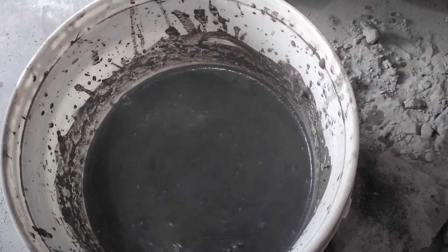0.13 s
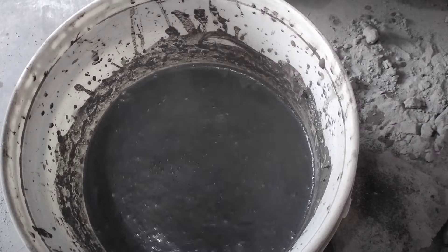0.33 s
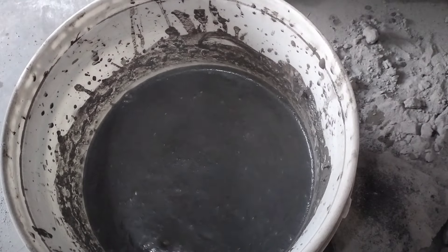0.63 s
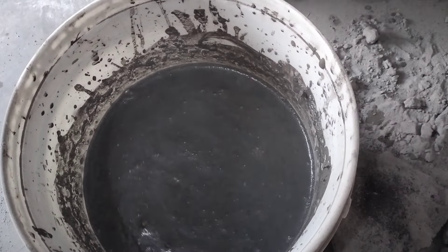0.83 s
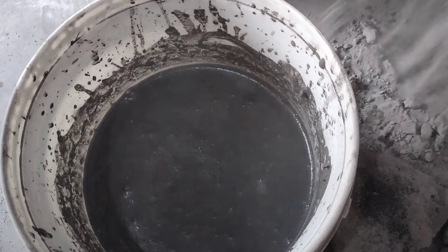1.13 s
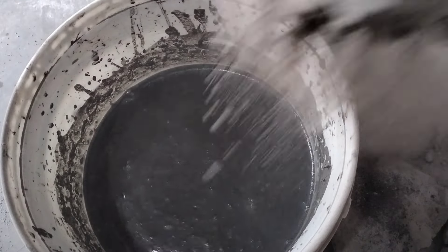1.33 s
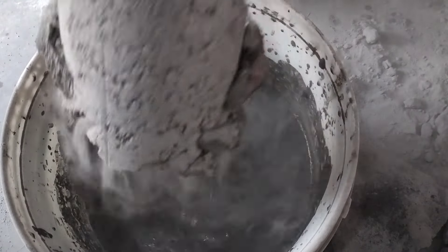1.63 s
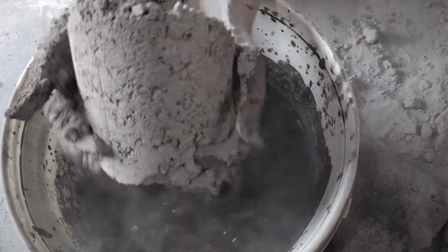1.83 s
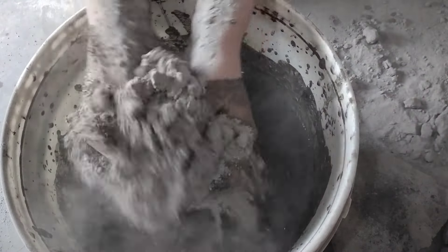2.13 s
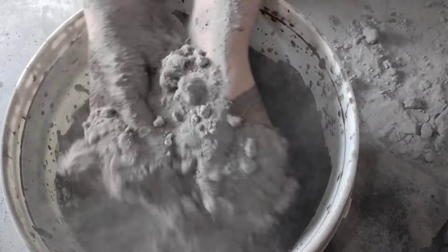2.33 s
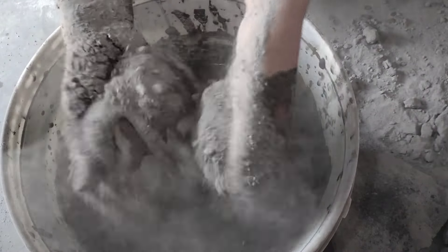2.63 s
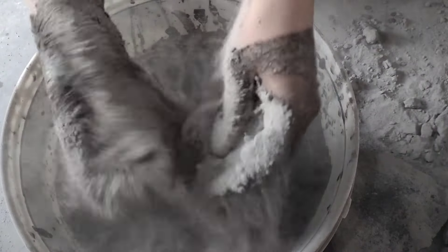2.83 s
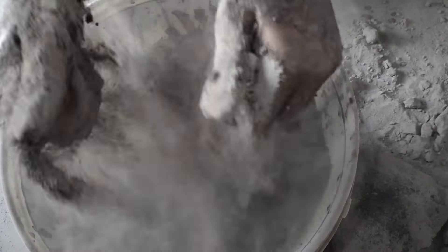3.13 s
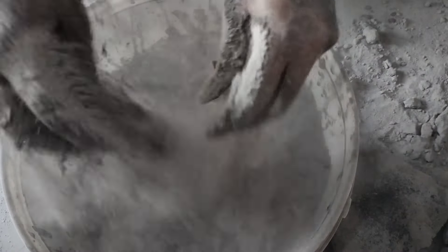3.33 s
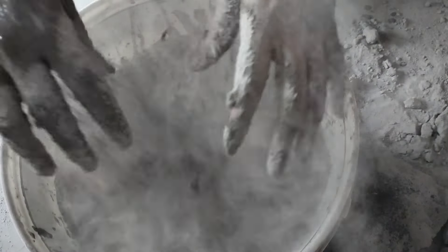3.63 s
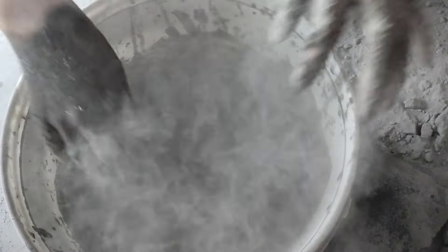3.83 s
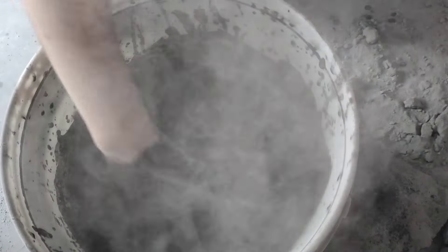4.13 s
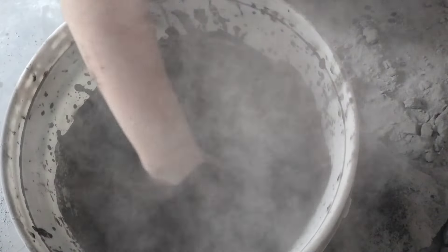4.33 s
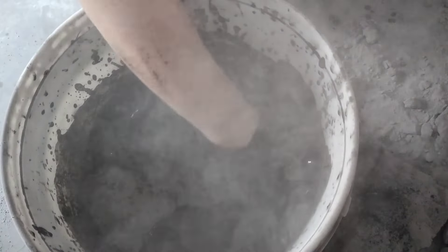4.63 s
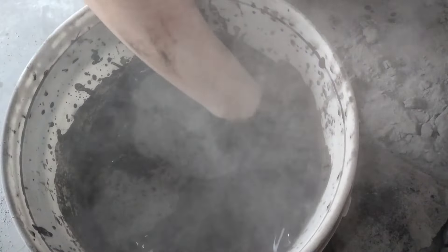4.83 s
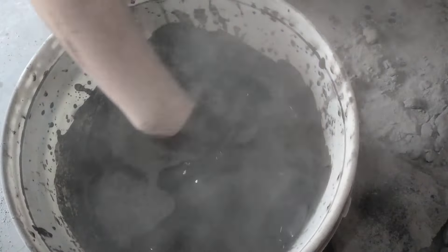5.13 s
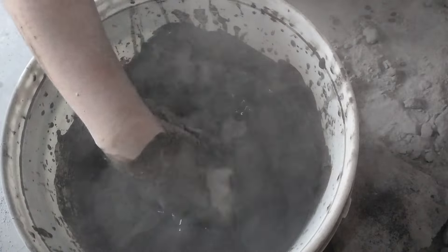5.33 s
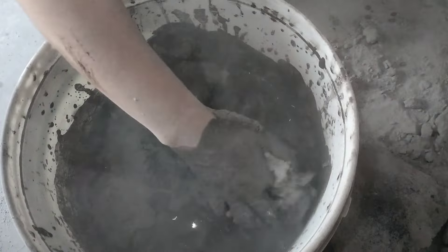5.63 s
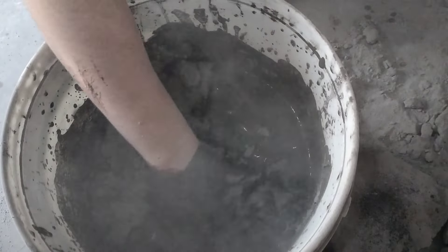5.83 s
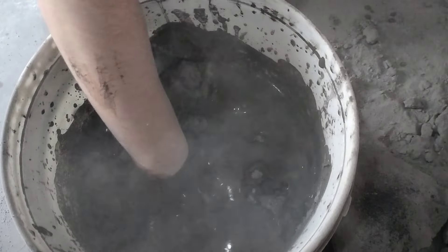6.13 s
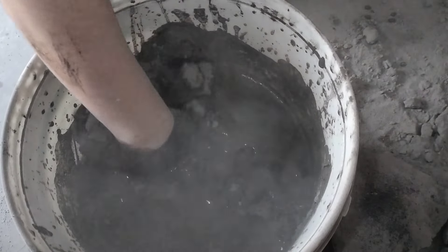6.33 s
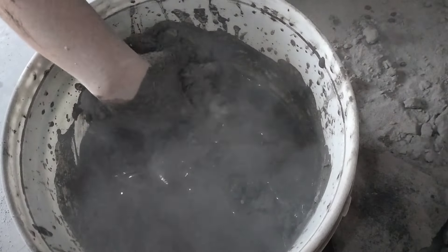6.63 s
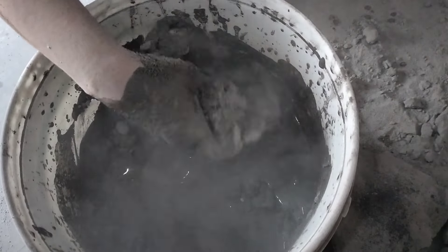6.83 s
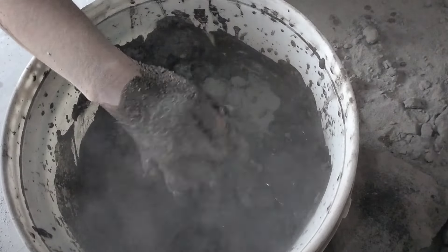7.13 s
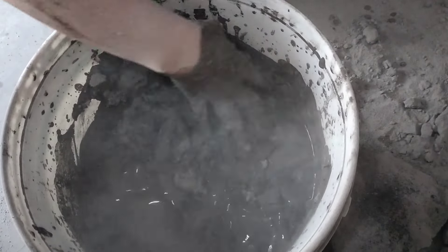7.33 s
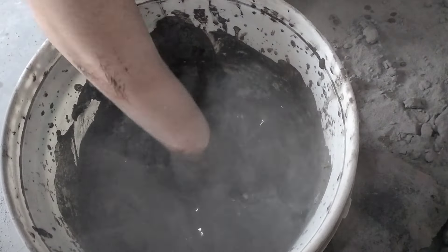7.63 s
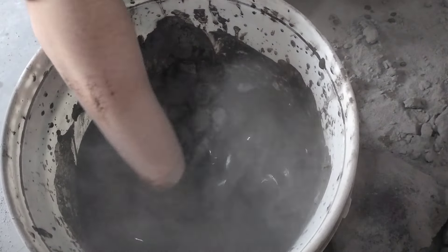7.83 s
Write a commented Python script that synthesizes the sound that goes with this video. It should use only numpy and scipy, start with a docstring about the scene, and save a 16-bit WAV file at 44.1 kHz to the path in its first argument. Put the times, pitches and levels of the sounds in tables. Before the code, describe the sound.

A close microphone above a plastic bucket indoors. Electrical hum and deep rumble come first, then short firm scrapes of packed powder. Dry lumps snap and crumble, grains rattling onto water in uneven spurts. Then wet sweeps of a hand churn the slurry: bubbling, fizzing, soft crunches, one clear hollow plop, tiny high ticks, and a final fizzy gush. A distant engine drones low in the middle.

```python
"""First come a wavering mains hum and a low rumble, then a block of dry powder scrapes as it is picked up.
It is crumbled into a bucket of water: grains patter as random clicks and bubbles, and lumps crack as noise.
One hand then stirs the gritty slurry. Bubble swarms churn and fizz; wet lumps crunch; air plops and ticks.
A far engine, made of two sine waves, swells and fades. Filtered noise makes the rumble and faint air."""
import sys
import numpy as np
from scipy import signal
from scipy.fft import rfft, irfft
from scipy.io import wavfile
from scipy.ndimage import uniform_filter1d

SR = 44100
rng = np.random.default_rng(int(sys.argv[2]) if len(sys.argv) > 2 else 0)


def transcribe(signal):
    """Save signal, clipped to [-1, 1], as a 16-bit WAV file at the path in sys.argv[1]."""
    frames = np.atleast_2d(signal).T
    limited = np.clip(frames, -1, 1)
    pcm = np.round(limited * 32767).astype(np.int16)
    wavfile.write(sys.argv[1], SR, pcm)


N = 352800
TIME = np.arange(N) / SR  # seconds

# Spills of powder; levels are relative, and fineness tilts the dust towards its top
# columns: start_s, rise_s, hold_s, fade_s, crumbs_db, dust_db, fineness_db
SPILLS = [(0.0, 0.011, 0.43, 0.096, -86, -75.5, 0), (1.04, 0.28, 0.048, 0.15, -56, -61.5, -2),
          (1.338, 0.039, 0.034, 0.13, -70.5, -58.5, 11), (1.454, 0.13, 0.09, 0.14, -60, -60, -11),
          (1.846, 0.076, 0.1, 0.12, -54.5, -65, -6.5), (2.067, 0.022, 0.009, 0.089, -49.5, -64, -14),
          (2.252, 0.038, 0.13, .05, -55.5, -64.5, -8), (2.348, 0.053, 0.056, 0.14, -46.5, -61, -6),
          (2.544, 0.029, 0.061, 0.051, -49, -57.5, -1), (2.61, 0.033, 0.037, 0.03, -53, -62, -2),
          (2.68, 0.093, 1.03, 0.068, -56.5, -75, -6), (3, 0.013, 0.017, 0.11, -71, -63.5, -2),
          (3.14, 0.1, 0.032, 0.27, -65, -68.5, -9)]
# Tone of the coarse crumbs; columns: frequency_hz, level_db
POUR_COLOUR = [(300, -24), (600, -16), (830, 6), (1100, 0.5), (1500, 6), (2600, -2.5), (3600, -5.5),
               (5000, -16), (9000, -25)]
# Tone of the fine dust; columns: frequency_hz, level_db
DUST_COLOUR = [(1800, -3), (3000, 2), (4200, -4.5), (5500, -1), (8000, -5), (12000, -0.5), (16000, -6)]


def pour():
    """Coarse crumbs patter on the water in uneven spurts; fine dust hisses with them."""
    shapes = [burst(*row[:4]) for row in SPILLS]
    crumb_db, dust_db, fineness_db = np.transpose(SPILLS)[4:]
    spurts = undb(1.1 * walk(60))
    swarm = bubble_swarm(low_hz=693, high_hz=3690, cycles=66, spread_db=2.0, count=3000)
    pellets = bubble_swarm(low_hz=1800, high_hz=6500, cycles=45, spread_db=1, count=3000)
    crumbs = colour(.5 * (swarm + pellets) + clicks(rate=4500, spread_db=5.5), POUR_COLOUR)
    crumbs = wall_echo(crumbs, lag_s=0.0028, sway_s=0.0002, share=.55)
    sand = clicks(rate=1200, spread_db=1.5)  # sparser grains stand out of the finest dust
    dust = colour(clicks(rate=15000, spread_db=1.0) + .5 * sand, DUST_COLOUR)
    dust = wall_echo(dust, lag_s=0.0023, sway_s=0.0003, share=.22)
    dust = fine_grains(dust, shapes, dust_db, fineness_db, corner_hz=8100) * undb(walk(80))
    return spurts * (undb(-4.5) * overlap(shapes, crumb_db) * crumbs + undb(2.5) * dust)


# Dry lumps cracking; levels are relative, and treble is relative to the starting level
# columns: start_s, level_db, treble_db, t60_s (time to fall 60 dB), centre_hz, width_hz
LUMPS = [(.888, -35, -11, 0.032, 1520, 300), (1.358, -33.5, -2, 0.024, 2600, 3000),
         (1.368, -36, -1.5, 0.03, 2710, 3020), (1.591, -40, -20, .025, 1350, 300),
         (1.618, -49, -18, .025, 1800, 900), (1.664, -40, -19, .03, 900, 300),
         (1.986, -37.5, -15, 0.086, 1800, 2000), (2.096, -36.5, -16, 0.039, 2640, 2200),
         (2.106, -41, -18, 0.032, 1500, 900), (2.345, -45, -18, 0.11, 1700, 1500),
         (2.378, -32, -20, 0.024, 1590, 700), (2.396, -31, -4, 0.035, 1900, 800),
         (2.414, -40, -16, .04, 1700, 1200), (2.437, -35, -11, 0.044, 1500, 1500),
         (2.456, -32, -5, 0.026, 2400, 1500), (2.464, -27, -16, 0.015, 1420, 500),
         (2.573, -29.5, 3, 0.031, 2300, 3000), (2.586, -25, -7, 0.065, 2880, 1600),
         (2.610, -26.5, -9, 0.029, 1490, 1100), (2.626, -36, -2, .05, 2400, 2500),
         (2.642, -35, -12, .04, 1700, 1500), (2.672, -27.5, -7, 0.021, 1300, 600),
         (2.69, -42, -20, .08, 1500, 1200), (2.808, -40, -26, 0.018, 1400, 700),
         (3.014, -37, -5, 0.094, 1780, 900), (3.038, -33, -20, 0.024, 1450, 700),
         (3.279, -34, -22, .028, 1400, 1100), (3.33, -40, -19, 0.076, 1620, 1200)]
# Tone of dry, crumbly material; columns: frequency_hz, level_db
CRUNCH_COLOUR = [(450, -2), (800, -32), (1100, 21.5), (1500, 18), (2000, 18), (2700, 13), (3700, 12.5),
                 (5000, -4), (9000, -24)]


def dry_lumps():
    """Dry lumps crack and crumble in the hand."""
    return crunches(LUMPS, CRUNCH_COLOUR, db=-11.0, treble_db=-8.5, crack=6)


# Soaked lumps collapsing in the fist; levels are relative, and treble is relative to the starting level
# columns: start_s, level_db, treble_db, t60_s (time to fall 60 dB), centre_hz, width_hz
SQUELCHES = [(4.258, -37, -16, 0.036, 1450, 400), (4.289, -45, -14, .04, 2830, 900),
             (4.328, -42, -16, .05, 1500, 1200), (4.346, -37, -8, 0.046, 1400, 1200),
             (4.5575, -30, -8, 0.053, 2900, 3000), (4.573, -35, -8, 0.074, 2000, 2500),
             (4.592, -38, -5, .04, 2900, 1200), (4.730, -34.5, -30, 0.031, 1100, 1000),
             (4.755, -34, -28, 0.055, 1440, 700), (4.773, -33.5, -29, 0.05, 1200, 1300),
             (4.839, -30, -21, 0.019, 1900, 2400), (4.935, -34.5, -24, .04, 1000, 600),
             (4.962, -44, -16, .05, 2740, 800), (5.591, -40.5, -1.5, 0.038, 2460, 1800),
             (5.690, -41, -4, 0.039, 2000, 2000), (7.159, -45.5, 1, 0.034, 1300, 2000),
             (7.198, -36.5, -13, 0.027, 2150, 1800), (7.251, -29, -16, 0.029, 1500, 600),
             (7.274, -34.5, -4, 0.022, 1090, 800), (7.276, -33, 5, 0.019, 4160, 1000),
             (7.301, -43.5, 4, .04, 2300, 600), (7.364, -38.5, -5, 0.046, 2520, 1200),
             (7.383, -40, -6, 0.058, 2200, 2200), (7.394, -39.5, -3, 0.051, 1480, 1500),
             (7.869, -58, -3, 0.13, 2020, 3000)]
# Tone of soaked material; columns: frequency_hz, level_db
SQUELCH_COLOUR = [(400, -7), (620, 3.5), (820, 21), (1050, 13.5), (1400, 16), (1900, 15), (2700, 7),
                  (3500, 10), (4300, 0), (8000, -30)]


def wet_lumps():
    """Soaked lumps collapse in the fist, by the same crack and avalanche of grains."""
    return crunches(SQUELCHES, SQUELCH_COLOUR, db=-5, treble_db=-5, crack=6)


# Tone of the fine splinters; columns: frequency_hz, level_db
SPLINTER_COLOUR = [(2800, 18), (4000, -1), (5500, 10.5), (8000, 10), (11000, 3), (16000, -2)]
SPLINTER_RISE_S, CRUNCH_GRAINS_PER_S = .0013, 2900


def crunches(table, body_colour, db, treble_db, crack):
    """Each lump gives one crack and a quick avalanche of grains, ringing at the lump's own pitch."""
    body, treble = np.zeros(N), np.zeros(N)
    t = np.arange(SR // 4) / SR
    material = colour(signal.unit_impulse(N), body_colour)[:SR // 40]
    density = CRUNCH_GRAINS_PER_S / SR
    for s, start_db, bright_db, t60, hz, width_hz in table:
        coarse, fine = rng.standard_normal((2, len(t))) * np.exp(-np.log(1000) * t / t60)
        coarse *= (rng.random(len(t)) < density) / np.sqrt(density)
        coarse[0] += crack
        ring = band(material, hz, width_hz)
        ring = ring / np.linalg.norm(ring)
        add(body, s, undb(start_db + db) * signal.fftconvolve(coarse, ring))
        # fine splinters follow the crack a moment later
        splinters = fine * (1 - np.exp(-t / SPLINTER_RISE_S))
        add(treble, s, undb(start_db + bright_db + treble_db) * splinters)
    return body + colour(treble, SPLINTER_COLOUR)


# Rubs on the packed powder as it is picked up; levels are relative
# columns: start_s, rise_s, hold_s, fade_s, body_db, rasp_db, squeak_db
RUBS = [(0.882, 0.008, .035, 0.014, -57, -58, -68), (0.94, 0.025, 0.08, 0.016, -57.5, -66.5, -70),
        (1.07, .02, .02, .02, -76, -72, -75), (1.165, 0.045, .075, .03, -53.5, -66, -77),
        (1.302, 0.013, 0.045, 0.024, -56.5, -70, -78)]
# The scrape's resonances shift with the grip; columns: time_s, body_hz, rasp_hz
SCRAPE_PITCH = [(.89, 1510, 3160), (0.931, 1500, 3360), (.98, 1510, 3600), (1.03, 1466, 3550),
                (1.1, 1510, 3700), (1.19, 1516, 3580), (1.25, 1479, 3510), (1.33, 1526, 3500)]
# Resonances of the rasp; columns: multiple of the rasp pitch, width_hz, level_db
RASP_MODES = [(.6, 240, -1.5), (.79, 190, -6), (1, 250, 6)]
SCOOP_HZ, SCOOP_WIDTH_HZ = 1520, 80  # body resonance before its pitch is shifted
RASP_HZ = 3450  # pitch at which the rasp has its listed widths
SQUEAK_RATIO, SQUEAK_WIDTH_HZ = 1.19, 250  # the squeak's pitch is this many times the rasp's


def scoop():
    """Lifted powder scrapes in fits: a firm resonance, a rasp and a squeak shift with the grip."""
    shapes = [burst(*row[:4]) for row in RUBS]
    body_db, rasp_db, squeak_db = np.transpose(RUBS)[4:]
    s, body_hz, rasp_hz = np.transpose(SCRAPE_PITCH)
    rub = clicks(rate=1600, spread_db=-1.5)
    body = unit(band(band(rub, SCOOP_HZ, SCOOP_WIDTH_HZ), SCOOP_HZ, 2 * SCOOP_WIDTH_HZ))
    body = shift_pitch(body, np.interp(TIME, s, body_hz) / SCOOP_HZ)
    grip = np.interp(TIME, s, rasp_hz) / RASP_HZ

    def catching(hz, width_hz):
        """One resonance of the rub, catching and slipping at random."""
        return shift_pitch(undb(5 * walk(40)) * band(band(rub, hz, width_hz), hz, width_hz), grip)

    rasp = unit(sum(undb(db) * catching(ratio * RASP_HZ, width_hz) for ratio, width_hz, db in RASP_MODES))
    squeak = unit(catching(SQUEAK_RATIO * RASP_HZ, SQUEAK_WIDTH_HZ))
    loose_grains = colour(clicks(rate=4900, spread_db=5.0), DUST_COLOUR)
    rasp = rasp + undb(-5) * loose_grains
    scrape = overlap(shapes, body_db) * body + overlap(shapes, rasp_db) * rasp
    return scrape + overlap(shapes, squeak_db) * squeak


# Tone of the churning bubbles; columns: frequency_hz, level_db
CHURN_COLOUR = [(300, -16.5), (430, -1), (620, -13.5), (810, 4.5), (1050, -3.5), (1350, -4.5), (1850, -1.5),
                (2300, -14), (3500, -37)]
# Tone of the fizzing powder; columns: frequency_hz, level_db
FIZZ_COLOUR = [(1300, 2), (2100, -9.5), (2650, -4), (3300, -7.5), (4200, -20), (6000, -11)]
# Tone of the crackling grit; columns: frequency_hz, level_db
SPRAY_COLOUR = [(3000, -4.5), (4300, -2.5), (5300, -0.5), (7500, -3), (10000, -5), (12000, -5),
                (16000, -11)]


def stir():
    """The hand churns up bubbles; soaking powder fizzes and grit crackles above them."""
    shapes, churn_db, fizz_db, grit_db, fineness_db = strokes()
    surge = undb(1.2 * walk(55))
    large = bubble_swarm(low_hz=636, high_hz=2440, cycles=22, spread_db=-1.0, count=3200)
    small = bubble_swarm(low_hz=1885, high_hz=4325, cycles=75, spread_db=-7.0, count=3500)
    tiny = bubble_swarm(low_hz=4050, high_hz=13060, cycles=140, spread_db=1.0, count=3000)
    blips = bubble_swarm(low_hz=1000, high_hz=2600, cycles=16, spread_db=3, count=450)
    churn = colour(large + 1.7 * blips + 11.6 * clicks(rate=1800, spread_db=1.5), CHURN_COLOUR)
    cavity = 1 + .035 * walk(9)  # the hollow around the hand keeps changing size
    churn = wall_echo(shift_pitch(churn, cavity), lag_s=0.00465, sway_s=0.00031, share=0.42)
    pips = bubble_swarm(low_hz=1900, high_hz=5200, cycles=50, spread_db=1.5, count=1500)
    fizz = colour(small + pips + 2.4 * clicks(rate=2500, spread_db=-0.5), FIZZ_COLOUR)
    fizz = wall_echo(shift_pitch(fizz, cavity), lag_s=0.0035, sway_s=0.0001, share=0.6)
    grit = unit(colour(0.37 * tiny + clicks(rate=10000, spread_db=2.0), SPRAY_COLOUR))
    grit = fine_grains(grit, shapes, np.array(grit_db), np.array(fineness_db), corner_hz=9600)
    grit = grit * undb(2.54 * walk(75))
    bubbling = overlap(shapes, churn_db) * churn + undb(-3.0) * overlap(shapes, fizz_db) * fizz
    return surge * (bubbling + undb(0.5) * grit)


# Sweeps of the hand through the slurry, timed at their fastest; levels are relative
# columns: time_s, half_length_s, churn_db, fizz_db, grit_db
SWEEPS = [(3.93, 0.19, -58.5, -64, -81), (4.195, 0.12, -54.5, -55, -71.5),
          (4.46, 0.11, -51.5, -53.5, -61.5), (4.774, 0.074, -48, -55.5, -65),
          (4.895, 0.075, -50.5, -52.5, -77), (5.29, 0.053, -59, -67, -92), (6.066, 0.17, -59.5, -59.5, -71),
          (6.309, 0.13, -50.5, -48, -57.5), (6.646, 0.18, -58, -54.5, -64.5), (7.025, 0.3, -80, -82, -70.5),
          (7.776, 0.12, -56.5, -66, -72)]
# Gushes as a squeezed lump lets its air go; levels are relative
# columns: start_s, hold_s, fade_s, churn_db, fizz_db, grit_db, fineness_db (of the grit)
GUSHES = [(4.25, 0.057, 0.011, -49, -48.5, -62.5, -4), (4.56, 0.017, 0.12, -47, -49.5, -61, 9),
          (4.829, 0.014, 0.12, -48, -52, -61.5, 9), (5.562, 0.07, 0.13, -57.5, -54, -63.5, 3.5),
          (7.13, 0.055, 0.059, -74, -64, -67, 12), (7.254, 0.027, 0.015, -66, -59, -56, -3),
          (7.347, 0.035, 0.12, -55.5, -48, -61, 4), (7.5, 0.0088, 0.011, -74, -55.5, -60.5, 7),
          (7.63, 0.048, 0.043, -54.5, -53, -68, 10), (7.853, 0.13, 0.31, -49.5, -52, -54.5, 8)]
SWEEP_FINENESS_DB, GUSH_RISE_S = 6, 0.024
# The stirred slurry simmers on between the strokes; levels are relative
SIMMER_START_S, SIMMER_RISE_S = 3.79, 0.37
SIMMER_CHURN_DB, SIMMER_FIZZ_DB, SIMMER_GRIT_DB = -71.5, -64.5, -77


def strokes():
    """Envelope, three levels and fineness of every movement in the slurry, as columns."""
    sweeps = [(swell(s, half_s), *levels, SWEEP_FINENESS_DB) for s, half_s, *levels in SWEEPS]
    gushes = [(burst(s, GUSH_RISE_S, hold_s, fade_s), *levels) for s, hold_s, fade_s, *levels in GUSHES]
    simmer_shape = np.clip((TIME - SIMMER_START_S) / SIMMER_RISE_S, 0, 1)
    simmer = (simmer_shape, SIMMER_CHURN_DB, SIMMER_FIZZ_DB, SIMMER_GRIT_DB, SWEEP_FINENESS_DB)
    return zip(*sweeps, *gushes, simmer)


# The forearm sweeping through the surface; columns: time_s, half_length_s, level_db, resonance_hz
SWISHES = [(5.328, 0.24, -57.5, 1570), (6.287, 0.11, -54, 3200), (6.693, 0.048, -55, 3080),
           (7.79, 0.098, -61, 1610)]


def swishes(width_hz):
    """Slurry slides along the arm and hisses in the trough behind it."""
    return resonant_swells(SWISHES, clicks(rate=2500, spread_db=-5), width_hz)


# Air pockets breaking the surface; levels are relative
# columns: start_s, level_db, pitch_hz (at the start), t60_s (time to fall 60 dB)
PLOPS = [(1.278, -34.5, 1380, 0.025), (1.361, -41, 910, 0.05), (4.207, -42, 786, .03),
         (4.354, -32.5, 830, 0.043), (4.564, -27.5, 863, 0.049), (4.622, -38, 780, 0.094),
         (4.733, -36, 1315, 0.09), (4.754, -37, 1130, .04), (4.777, -31.5, 790, 0.089),
         (4.84, -37, 910, .035), (4.949, -44, 746, 0.033), (5.023, -36, 1380, 0.015),
         (5.022, -32.5, 865, 0.04), (5.353, -42, 1550, 0.04), (5.86, -26, 784, 0.031),
         (5.981, -37.5, 1480, 0.024), (7.251, -39, 980, 0.021), (7.276, -33, 710, .02),
         (7.276, -34, 1350, .02)]


def plops(db, pitch_rise, slap):
    """An air pocket opens: its cavity rings while the mud film tears."""
    out = np.zeros(N)
    for s, level_db, hz, t60 in PLOPS:
        ring = bubble(hz, t60, pitch_rise)
        tear = unit(band(rng.standard_normal(SR // 4), hz, hz))[:len(ring)]
        tear = tear * np.exp(-np.log(1000) * np.linspace(0, 1, len(ring)))
        add(out, s, undb(level_db + db) * (ring + slap * tear))
    return out


# Tiny bubbles bursting; columns: start_s, level_db (peak of the snap), pitch_hz
TICKS = [(3.8735, -40.5, 4700), (5.107, -46, 4400), (5.1452, -57.5, 6300), (5.4673, -61, 6030),
         (5.914, -46, 8670), (6.0227, -53, 4560), (6.0516, -55, 11300), (6.0866, -52, 11600),
         (6.155, -47, 7840), (6.932, -51, 12900), (6.94, -47, 7070), (7.011, -48, 7250),
         (7.0798, -51, 7100)]


def ticks(width_hz, decay_s):
    """A tiny bubble's skin opens with a short noise snap and a high chirp."""
    out, t = np.zeros(N), np.arange(SR // 30) / SR
    for s, peak_db, hz in TICKS:
        puff = rng.standard_normal(len(t)) * np.exp(-t / decay_s)
        snap = band(band(puff, hz, width_hz), hz, width_hz)
        add(out, s, undb(peak_db) * snap / np.abs(snap).max())
        add(out, s, undb(peak_db - 8.0) * bubble(hz, t60=0.017, pitch_rise=0.068))
    return out


# A hand dragging on the rim; columns: time_s, half_length_s, level_db, pitch_hz
RIM_RUBS = [(2.963, 0.13, -60, 819)]


def rim_rubs(width_hz):
    """Friction keeps one narrow mode of the bucket's wall ringing."""
    return resonant_swells(RIM_RUBS, clicks(rate=3200, spread_db=-8.0), width_hz)


# The bucket bumped; columns: start_s, level_db (relative)
KNOCKS = [(1.279, -53.5), (1.38, -55), (1.666, -57), (3.757, -51), (4.746, -48), (4.773, -47), (7.252, -50),
          (7.275, -47), (7.364, -58), (7.388, -59)]
# The bucket's hollow modes; columns: pitch_hz, level_db (relative), t60_s (time to fall 60 dB)
BUCKET_MODES = [(427, 8, 0.33), (370, 21.5, 0.0086), (480, -5.5, 0.063), (315, -6.5, 0.11), (806, 0, 0.13)]


def knocks(db):
    """A bump rings the bucket's hollow modes."""
    out, t = np.zeros(N), np.arange(SR // 4) / SR
    ring = np.zeros(len(t))
    for hz, mode_db, t60 in BUCKET_MODES:
        ring += undb(mode_db) * np.sin(2 * np.pi * hz * t) * np.exp(-np.log(1000) * t / t60)
    for s, level_db in KNOCKS:
        add(out, s, undb(level_db + db) * ring)
    return out


# Far engine speeding up; columns: time_s, firing_hz, level_db (before the room's boost)
ENGINE = [(3.05, 55, -48), (3.351, 57.4, -32.5), (3.92, 62.7, -29), (4.1, 65, -34.5), (4.52, 69.3, -28),
          (4.75, 70.82, -32.5), (5.0, 70.46, -29.5), (5.7, 72.1, -45.5)]
# Room modes that boom as the engine passes through them; columns: pitch_hz, width_hz, boost_db
ROOM_MODES = [(62.3, 2.8, 2), (69.2, 0.91, 7.5)]


def engine():
    """A far engine speeds up; it booms whenever its firing rate meets a mode of the room."""
    s, hz, db = np.transpose(ENGINE)
    firing_hz = np.interp(TIME, s, hz)
    boost_db = np.zeros(N)
    for mode_hz, width_hz, mode_db in ROOM_MODES:
        boost_db += mode_db * np.exp(-((firing_hz - mode_hz) / width_hz * np.sqrt(2)) ** 2)
    firing = 2 * np.pi * np.cumsum(firing_hz) / SR
    tone = unit(np.sin(firing) + undb(-35) * np.sin(3 * firing))
    return gains(np.c_[s, db])[0] * undb(boost_db) * tone


# Swells of the deep rumble; columns: time_s, half_length_s, level_db
SWELLS = [(1.66, .07, -35), (1.846, 0.07, -42), (2.06, 0.11, -29), (2.324, 0.055, -32.5),
          (2.683, 0.086, -30.5), (3.278, 0.28, -36.5), (3.798, 0.2, -28.5), (4.736, 0.85, -32),
          (5.593, 0.12, -37), (6.066, 0.059, -31.5), (6.44, 0.12, -36), (6.74, 0.078, -34),
          (7.256, 0.32, -36.5), (7.666, 0.12, -28), (7.84, 0.058, -29.5)]
# Tone of those swells; columns: frequency_hz, level_db
SWELL_COLOUR = [(28, -17.5), (42, -10), (50, -10.5), (60, 3), (70, 4.5), (85, -4.5), (120, -11), (140, -41)]
# Tone of the steady rumble; columns: frequency_hz, level_db
RUMBLE_COLOUR = [(20, -37.5), (32, -15), (42, -3), (50, -12), (60, -2), (70, 2), (85, -3.5), (105, -2.5),
                 (120, 2), (138, -39), (200, -48.5)]
# A narrow low drone that comes and goes; columns: time_s, half_length_s, level_db, pitch_hz
DRONES = [(3.7, 0.19, -40.5, 161), (5.6, 0.37, -47, 163), (7.75, 0.35, -42.5, 159.8)]
# Level of the room's boom; columns: time_s, level_db (relative)
BOOM = [(0, -48), (1.0, -43.5), (1.8, -44.5), (2.1, -40.5), (2.6, -40.5), (3.1, -43), (3.7, -42.5),
        (4.9, -40.5), (6.7, -49), (7.3, -47.5), (7.7, -44.5), (8, -44.5)]
# Tone of the boom; columns: frequency_hz, level_db
BOOM_COLOUR = [(110, -6.5), (140, -1.5), (163, 3), (188, -9), (208, -0.5), (232, -0.5), (258, -8.5),
               (275, -9.5), (305, -19), (400, -38.5)]
# Level of the hollow drone; columns: time_s, level_db (before it wavers)
HOLLOW = [(0, -65), (1.8, -66.5), (2.1, -52.5), (2.68, -50), (2.9, -55), (3.45, -53.5), (4.1, -60),
          (4.75, -52), (5.3, -62), (6.9, -61.5), (7.7, -58.5), (8, -60.5)]
# Tone of the hollow drone; columns: frequency_hz, level_db
HOLLOW_COLOUR = [(280, -15), (325, -4), (365, 2.5), (392, -0.5), (425, 4.5), (470, -17), (560, -12),
                 (700, -39)]
# Tone of the faint air noise; columns: frequency_hz, level_db
AIR_COLOUR = [(350, -5.5), (500, 7.5), (660, 1), (820, 4.5), (1050, 0.5), (1500, -1.5), (2200, -8.5),
              (3200, -16), (4300, -23), (6000, -21), (9000, -22.5), (12000, -20.5), (16000, -23.5)]
RUMBLE_DB = -37.5
AIR_DB, HUM_DB, HUM_HZ = -61.5, -34.3, 100.24  # middle values; air and hum waver around them


def background():
    """A wavering mains hum, a far engine, rumble booming in the room's low modes, and faint air noise."""
    shapes = [swell(*row[:2]) for row in SWELLS]
    swell_db = np.transpose(SWELLS)[2]
    rumble = undb(RUMBLE_DB) * colour(rng.standard_normal(N), RUMBLE_COLOUR)
    rumble += overlap(shapes, swell_db) * colour(rng.standard_normal(N), SWELL_COLOUR)
    drone = resonant_swells(DRONES, rng.standard_normal(N), width_hz=20)
    boom = undb(0.6 + 1.3 * walk(8.6)) * colour(rng.standard_normal(N), BOOM_COLOUR) * gains(BOOM)[0]
    hollow = undb(walk(4.8)) * colour(rng.standard_normal(N), HOLLOW_COLOUR) * gains(HOLLOW)[0]
    flutter = undb(.7 * walk(4) + 1.1 * walk(45))
    air = wall_echo(colour(rng.standard_normal(N), AIR_COLOUR), lag_s=.005, sway_s=0.00031, share=0.35)
    air = undb(AIR_DB) * flutter * air
    waver_db = 1.7 * walk(7)
    hum = undb(HUM_DB + waver_db) * unit(np.sin(2 * np.pi * HUM_HZ * TIME + 0.15 * walk(2.2)))
    return rumble + drone + boom + hollow + air + hum + engine()


def room(x, echo_s, echo_db, tail_db, t60):
    """A hard surface nearby returns one echo; the walls add a short tail."""
    t = np.arange(SR // 2) / SR
    tail = rng.standard_normal(len(t)) * np.exp(-np.log(1000) * t / t60) * (t > echo_s / 2)
    response = undb(tail_db) * tail / np.linalg.norm(tail)
    response[0] += 1  # the direct sound
    response[int(echo_s * SR)] += undb(echo_db)
    return signal.fftconvolve(x, response)[:N]


def wall_echo(x, lag_s, sway_s, share):
    """The sound also bounces off a near surface; the path changes a little, so the colour shifts."""
    lag = lag_s + sway_s * uniform_filter1d(walk(7), SR // 20)
    return unit(x + share * np.interp(TIME - lag, TIME, x))


def bubble(hz, t60, pitch_rise):
    """A damped ring whose pitch moves as the cavity opens."""
    t = np.arange(int(t60 * SR) + 2) / SR
    ring = np.sin(2 * np.pi * hz * t * (1 + pitch_rise * t / t60))
    onset = (1 - np.exp(-2 * hz * t)) ** 2
    return ring * np.exp(-np.log(1000) * t / t60) * onset


def bubble_swarm(low_hz, high_hz, cycles, spread_db, count):
    """Bubbles of random size, time and strength; each is damped over about the given number of cycles."""
    out = np.zeros(N)
    for when, size, damping, strength in rng.random((count, 4)):
        hz = low_hz * (high_hz / low_hz) ** size
        gain = undb(-spread_db * np.log(strength + 0.098))
        add(out, when * N / SR, gain * bubble(hz, cycles * (.5 + damping) / hz, pitch_rise=0.166))
    return unit(out)


def fine_grains(x, shapes, levels_db, fineness_db, corner_hz):
    """Bursts of hiss: fine grains lift its top and thin its lower part; coarse ones do the reverse."""
    top = signal.sosfiltfilt(signal.butter(2, corner_hz, "high", fs=SR, output="sos"), x)
    lower = x - top
    bright = top * overlap(shapes, levels_db + fineness_db / 2)
    return bright + lower * overlap(shapes, levels_db - fineness_db / 2)


def resonant_swells(table, drive, width_hz):
    """Each row of the table swells one steep resonance, fed by the drive."""
    out = np.zeros(N)
    for s, half_s, db, hz in table:
        out += undb(db) * swell(s, half_s) * unit(band(band(drive, hz, width_hz), hz, width_hz))
    return out


def burst(start_s, rise_s, hold_s, fade_s):
    """Envelope that rises, holds and dies away exponentially."""
    t = TIME - start_s
    return np.clip(t / rise_s, 0, 1) * np.exp(-np.maximum(t - rise_s - hold_s, 0) / fade_s)


def swell(s, half_s):
    """Bell-shaped envelope of a smooth movement."""
    return np.exp(-np.minimum(((TIME - s) / half_s) ** 2, 20))


def overlap(shapes, levels_db):
    """Joint gain of envelopes at their own levels; their powers add."""
    return np.sqrt(sum((undb(db) * shape) ** 2 for shape, db in zip(shapes, levels_db)))


def undb(db):
    """Decibels to gain."""
    return 10 ** (np.asarray(db) / 20)


def unit(x):
    """Scale to rms 1."""
    return x / np.sqrt(np.mean(x ** 2))


def gains(table):
    """One gain curve for each dB column, with short fades just outside the table's span."""
    s, *columns = np.transpose(table)
    fades = np.interp(TIME, [s[0] - .2, s[0], s[-1], s[-1] + .1], [0, 1, 1, 0])
    return [undb(np.interp(TIME, s, column)) * fades for column in columns]


def colour(x, points):
    """Causal filter with the given (Hz, dB) spectrum; white noise keeps its level."""
    hz, db = np.transpose(points)
    # fall away below the first point and above the last
    log_hz = np.log(np.r_[hz[0] / 2, hz, hz[-1] * 2])
    all_db = np.r_[db[0] - 30, db, db[-1] - 40]
    bins_hz = np.arange(N // 2 + 1) * SR / N
    gain = unit(undb(np.interp(np.log(bins_hz + 1), log_hz, all_db)))
    # folding the cepstrum gives minimum phase: nothing sounds before its cause
    cepstrum = irfft(np.log(gain), N) * np.r_[1, np.full(N // 2 - 1, 2), np.zeros(N // 2)]
    return irfft(rfft(x) * np.exp(rfft(cepstrum)), N)


def band(x, hz, width_hz):
    """One resonance, gain 1 at its centre."""
    return signal.lfilter(*signal.iirpeak(hz, hz / width_hz, fs=SR), x)


def walk(rate):
    """Smooth random wandering with a spread near 1, through `rate` random points a second."""
    return np.interp(TIME * rate, np.arange(4096), rng.standard_normal(4096)) * 1.2


def clicks(rate, spread_db):
    """Random clicks of uneven strength, about `rate` a second, at rms 1."""
    size = undb(spread_db * np.minimum(rng.exponential(size=N), 4.5))
    return unit((rng.random(N) < rate / SR) * size * rng.choice([-1, 1], N))


def shift_pitch(x, ratio):
    """Move a sound's resonances by a changing pitch ratio."""
    return np.interp(np.cumsum(ratio) % N, np.arange(N), x)


def add(out, s, x):
    """Mix a short sound in at time s."""
    i = int(s * SR)
    out[i:i + len(x)] += x[:N - i]


CEILING_ECHO_S = .013


def scene():
    """Everything in the bucket sounds into the room, over the background."""
    slurry = stir() + swishes(width_hz=710) + wet_lumps() + plops(db=-2.5, pitch_rise=0.052, slap=0.069)
    bucket = scoop() + rim_rubs(width_hz=30) + pour() + dry_lumps() + slurry + knocks(db=-3.5)
    bucket = room(bucket, echo_s=CEILING_ECHO_S, echo_db=-18.5, tail_db=-11, t60=0.23)
    # high chirps beam straight up out of the bucket, so their echo is stronger
    chirps = ticks(width_hz=2200, decay_s=0.0035)
    chirps = room(chirps, echo_s=CEILING_ECHO_S, echo_db=-9.5, tail_db=-3.5, t60=0.15)
    return (bucket + chirps + background())[None]


TOP_HZ = 15850


def record(dry):
    """A steep low-pass filter cuts the treble above TOP_HZ."""
    return signal.sosfilt(signal.ellip(10, .2, 80, TOP_HZ, fs=SR, output="sos"), dry)


dry = scene()
out = record(dry)
transcribe(out)
```